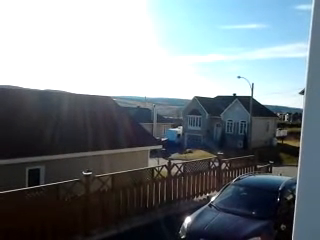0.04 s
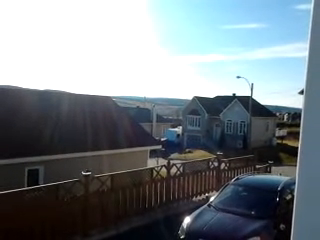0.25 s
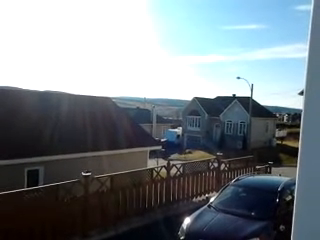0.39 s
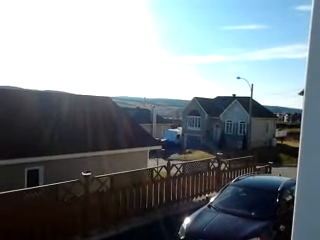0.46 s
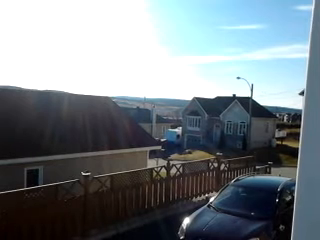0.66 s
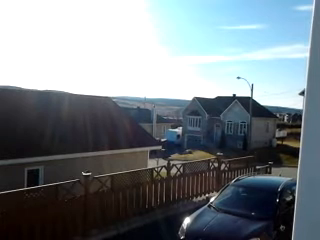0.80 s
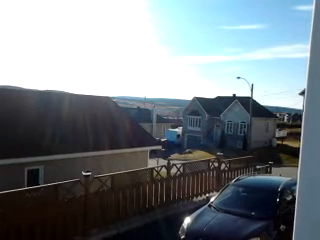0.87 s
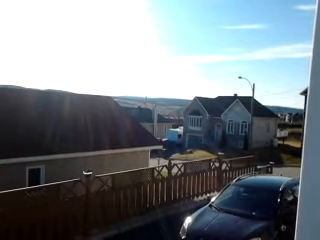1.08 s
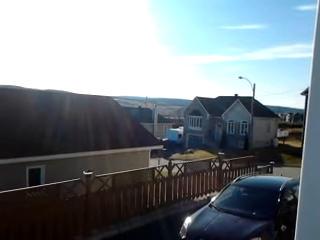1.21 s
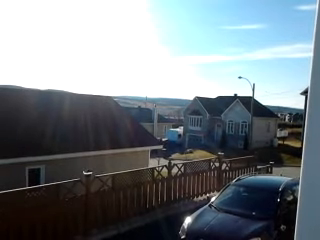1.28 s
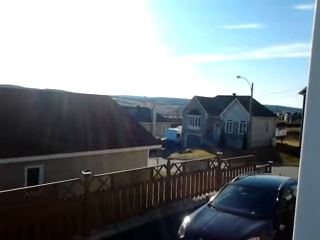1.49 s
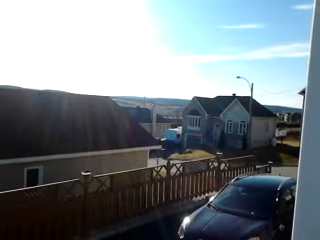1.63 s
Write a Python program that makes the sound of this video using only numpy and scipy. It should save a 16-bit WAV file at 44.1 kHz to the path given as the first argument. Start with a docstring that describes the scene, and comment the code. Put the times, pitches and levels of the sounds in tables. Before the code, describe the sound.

Wind bumps softly against the microphone in a quiet neighbourhood and soon eases off. Faint far traffic, a low engine hum and light hiss continue behind it, while several small, high clicks come from nearby.

```python
"""Quiet street from a porch

A short gust buffets the microphone with soft low thumps. Behind it: the wash of distant traffic,
the low harmonics of an idling engine, a faint far whine and microphone hiss.
Small hard parts tick close by, and a thin whistle comes twice."""
import sys
import numpy as np
from scipy import signal
from scipy.fft import rfft, irfft
from scipy.io import wavfile
from scipy.ndimage import uniform_filter1d

SR = 44100
rng = np.random.default_rng(int(sys.argv[2]) if len(sys.argv) > 2 else 0)


def file_out(sig):
    """Save sig as 16-bit WAV at sys.argv[1]."""
    # one column per channel
    cols = np.atleast_2d(sig).T
    # limit, then scale
    lim = np.clip(cols, -1, 1)
    pcm = np.round(lim * 32767).astype(np.int16)
    wavfile.write(sys.argv[1], SR, pcm)


N = 72765
TIME = np.arange(N) / SR


def amp(db):
    """Decibels to gain."""
    return 10 ** (np.asarray(db) / 20)


def unit(x):
    """Scale to rms 1."""
    return x / np.sqrt(np.mean(x ** 2) + 1e-20)


def level(points):
    """Gain over time from (time [s], level [dB]) points."""
    return amp(np.interp(TIME, *np.transpose(points)))


def colour(points, hz):
    """Gain over frequency from (frequency [Hz], level [dB]) points."""
    points_hz, db = np.transpose(points)
    return amp(np.interp(np.log(hz + 1), np.log(points_hz + 1), db))


def add(mix, start_s, sound):
    """Mix a sound in at start_s."""
    part = mix[max(round(start_s * SR), 0):][:len(sound)]
    part += sound[:len(part)]


def drift(rate_hz):
    """Low-passed random wander, rms about 1."""
    hz = np.fft.rfftfreq(2 * N, 1 / SR)
    white = rfft(rng.standard_normal(2 * N))
    return unit(irfft(white * np.exp(-(hz / rate_hz) ** 2)))[:N]


def noise(spectrum, patchy_db):
    """Coloured noise, rms 1; the level drifts in small time-frequency patches."""
    hz = np.fft.rfftfreq(2048, 1 / SR)
    real, imag, patches = rng.standard_normal((3, N // 512 + 6, len(hz)))
    patches = uniform_filter1d(patches, size=8, axis=0)
    patches = unit(uniform_filter1d(patches, size=9, axis=1))
    frames = (real + 1j * imag) * colour(spectrum, hz) * amp(patchy_db * patches)
    return unit(signal.istft(frames.T, nperseg=2048, noverlap=1536)[1][:N])


def wind():
    """Gust at the microphone: low turbulence; each large eddy is a brief pressure dip that rebounds."""
    # turbulence spectrum (frequency [Hz], relative density [dB])
    spectrum = [(12, -1), (35, -2), (75, 5), (130, -2), (200, -13), (320, -12.5), (600, -72)]
    # turbulence strength (time [s], level [dB])
    gust = [(0, -71), (.105, -59), (.135, -47), (.18, -51), (.27, -51.5), (.38, -38), (.44, -45.5),
            (.55, -44), (.64, -44.5), (.73, -57), (.79, -52), (.92, -64.5), (1.22, -57), (1.31, -58),
            (1.4, -50), (1.5, -63.5), (1.65, -57)]
    # eddies (time [s], pitch [Hz], peak before low-pass [dB])
    eddies = [(.124, 76, -34.5), (.207, 68.6, -37.5), (.246, 82, -35.5), (.311, 110, -28),
              (0.342, 115, -30), (.365, 85, -35), (.379, 146, -26.5), (.391, 113, -25.5),
              (.490, 123, -31.5), (0.5114, 109, -25.5), (0.5609, 102, -19), (0.5659, 159, -20),
              (.573, 150, -27.5), (.616, 97, -32.5), (.642, 85, -30), (0.658, 67, -36.5), (.675, 62, -38),
              (0.711, 50.7, -39), (0.785, 78.5, -37), (1.395, 75, -42.5), (1.604, 42, -40.5)]
    rise_cycles, fall_cycles, cutoff_hz = 0.41, 0.38, 254
    thumps = np.zeros(N)
    for centre_s, hz, db in eddies:
        cycles = (TIME - centre_s) * hz
        width = np.where(cycles < 0, rise_cycles, fall_cycles)
        thumps -= amp(db) * np.cos(2 * np.pi * cycles) * np.exp(-(cycles / width) ** 2)
    lowpass = signal.butter(5, cutoff_hz, fs=SR, output="sos")
    turbulence = noise(spectrum, patchy_db=1.5) * level(gust)
    return signal.sosfiltfilt(lowpass, thumps) + turbulence


def ticks():
    """A small hard part rings for a few cycles, with a noisy snap that dies in a short tail."""
    # ticks (start [s], pitch [Hz], ring peak [dB], snap gain [ratio], rise [s])
    hits = [(.391, 7250, -45.5, .08, .00026), (.4122, 7350, -45, .1, 0.00028),
            (0.5955, 8270, -31, 0.12, 0.00028), (1.013, 8100, -44.5, .1, 0.00024),
            (1.2022, 7500, -42.5, .06, 0.00045), (1.2705, 7400, -39, 0.76, .00026)]
    # snap spectrum (frequency [Hz], relative density [dB])
    spectrum = [(2700, -30), (3900, -2), (5500, -8), (7500, 5), (10500, -9.5), (13000, 0), (16000, -8)]
    tail_db, tail_s = -12, 0.0054
    out = np.zeros(N)
    t = np.arange(0, 0.03, 1 / SR)
    grit = noise(spectrum, patchy_db=2)
    for start_s, hz, db, snap_gain, rise_s in hits:
        burst = (t / rise_s) ** 2 * np.exp(2 * (1 - t / rise_s))
        tail = amp(tail_db) * np.minimum(t / rise_s, 1) * np.exp(-t / tail_s)
        ring = burst * np.sin(2 * np.pi * hz * t)
        snap = (burst + tail) * grit[round(start_s * SR):][:len(t)]
        add(out, start_s, amp(db) * (ring + snap_gain * snap))
    return out


def traffic():
    """Far tyres and engines merge into a steady wash."""
    # wash spectrum (frequency [Hz], relative density [dB])
    spectrum = [(25, 4.5), (75, -7), (150, -5), (250, -2.5), (420, -6.5), (680, -5), (1200, -6), (1520, -9),
                (1850, -9), (2250, -18.5), (3000, -26.5), (6000, -79)]
    # wash envelope (time [s], gain [dB])
    envelope = [(0, 0.5), (.2, 1.5), (.5, -1), (.8, .5), (1.3, -0.4), (1.65, -0.5)]
    return amp(db=-52) * noise(spectrum, patchy_db=0.7) * level(envelope)


def engine():
    """Low harmonics of a slightly unsteady idle."""
    # idle harmonics (multiple of firing rate, level at 0 dB gain [dB])
    harmonics = [(2, -53.5), (3, -60), (4, -69)]
    # idle envelope (time [s], gain [dB])
    envelope = [(0, -11.5), (.6, -2.5), (1.0, 0), (1.65, -1.5)]
    firing_hz = 60.94
    firings = np.cumsum(firing_hz * (1 + 0.0045 * drift(rate_hz=2.1))) / SR
    hum = np.zeros(N)
    for order, db in harmonics:
        flutter = 1 + 0.3 * drift(rate_hz=13)
        hum += amp(db) * flutter * np.sin(2 * np.pi * (order * firings + rng.random()))
    return np.sqrt(2) * hum * level(envelope)


def whine():
    """Far tones that waver on the way, swell and fade."""
    # whine partials (frequency [Hz], level at 0 dB gain [dB])
    partials = [(1247, -63), (1280, -68), (1312, -70), (1506, -73), (1652, -71), (1684, -71.5),
                (1700, -65.5), (1766, -69.5), (1814, -69)]
    # whine envelope (time [s], gain [dB])
    envelope = [(0, -7.5), (.45, -4), (.8, 2), (1.15, -5.5), (1.65, -41)]
    out = np.zeros(N)
    for hz, db in partials:
        cycles = np.cumsum(hz * (1 + 0.00062 * drift(rate_hz=21))) / SR
        flutter = 1 + 0.3 * drift(rate_hz=12)
        out += amp(db) * flutter * np.sin(2 * np.pi * cycles)
    return np.sqrt(2) * out * level(envelope)


def whistle():
    """Two faint, slightly rough, fading notes on one pitch, perhaps a far bird."""
    # notes (start [s], length [s], level before fade [dB])
    notes = [(1.094, 0.11, -62), (1.203, 0.064, -60)]
    pitch_hz, ramp_s, fade_db = 3906, 0.013, -16
    cycles = np.cumsum(pitch_hz * (1 + 0.0011 * drift(rate_hz=120))) / SR
    roughness = 1 + 0.095 * drift(rate_hz=150)
    envelope = np.zeros(N)
    for start_s, length_s, db in notes:
        t = np.arange(0, length_s, 1 / SR)
        ramps = np.clip(np.minimum(t, length_s - t) / ramp_s, 0, 1)
        add(envelope, start_s, ramps * amp(db + fade_db * (t / length_s) ** 2))
    return np.sqrt(2) * envelope * roughness * np.sin(2 * np.pi * cycles)


def swells():
    """Narrow bands of the far noise stand out briefly."""
    # noise swells (centre [s], half length [s], pitch [Hz], level [dB])
    bands = [(0.2, 0.047, 945, -57.5), (1.37, .03, 661, -58), (1.575, 0.023, 739, -54.5)]
    width_hz = 65
    out = np.zeros(N)
    for centre_s, half_s, hz, db in bands:
        phase = 2 * np.pi * hz * TIME
        band = drift(width_hz) * np.cos(phase) + drift(width_hz) * np.sin(phase)
        out += amp(db) * np.exp(-((TIME - centre_s) / half_s) ** 2) * band
    return out


def hiss():
    """Steady microphone self-noise."""
    # hiss spectrum (frequency [Hz], relative density [dB])
    spectrum = [(1000, -12), (3100, -4), (4200, 0), (6300, -3.5), (7400, -1), (8400, -3.5), (10200, -6),
                (15800, -8.5)]
    return amp(db=-62.5) * noise(spectrum, patchy_db=2.5)


def scene():
    """All sources at one microphone."""
    return (traffic() + engine() + whine() + wind() + ticks() + whistle() + hiss() + swells())[None]


def record(dry):
    """Recorder band limit."""
    cutoff_hz = 15820
    lowpass = signal.firwin(511, cutoff_hz, window=("kaiser", 9), fs=SR)
    return signal.oaconvolve(dry, lowpass[None], "same")


dry = scene()
out = record(dry)
file_out(out)
```